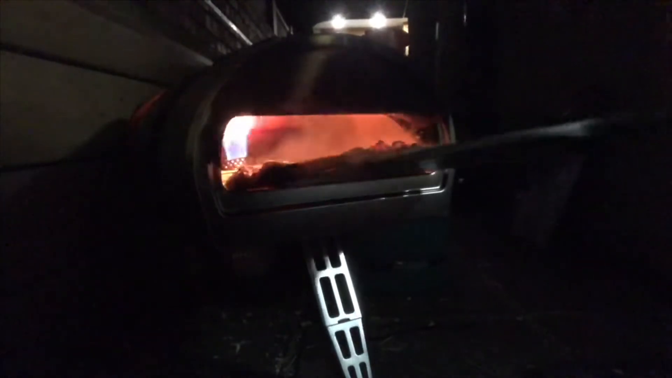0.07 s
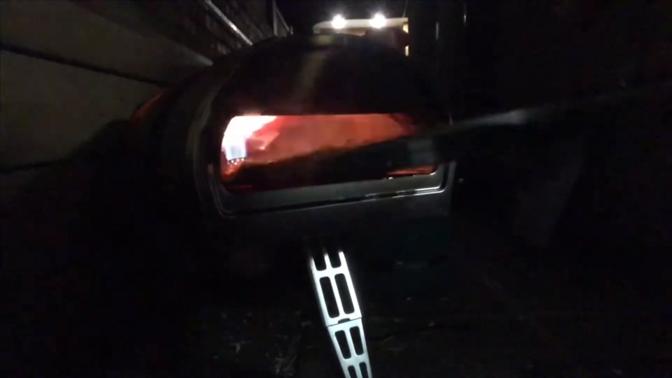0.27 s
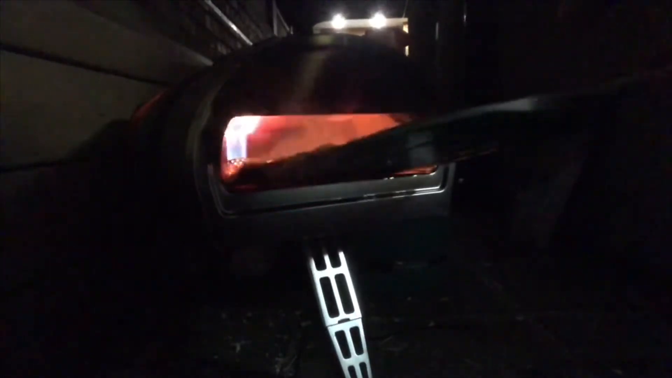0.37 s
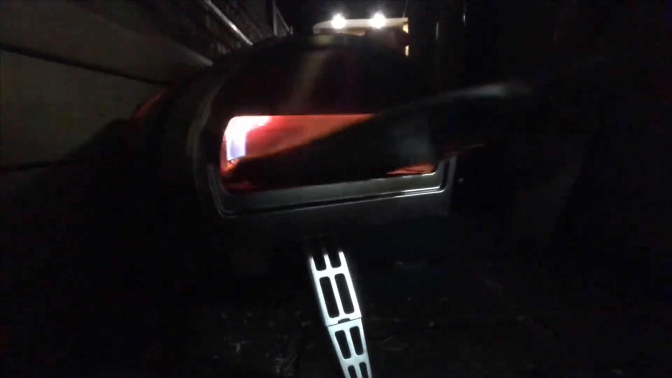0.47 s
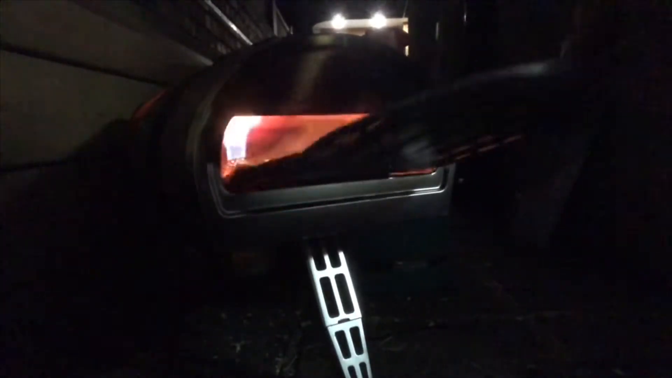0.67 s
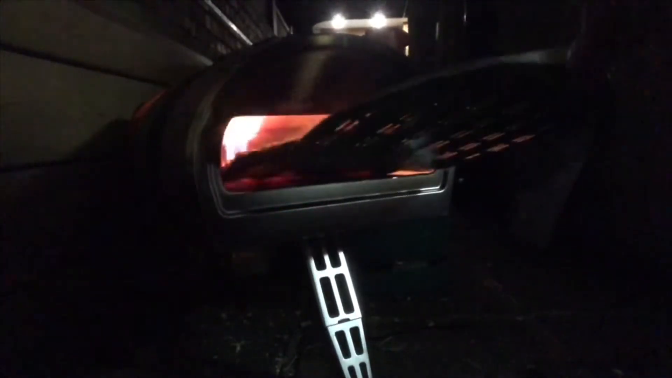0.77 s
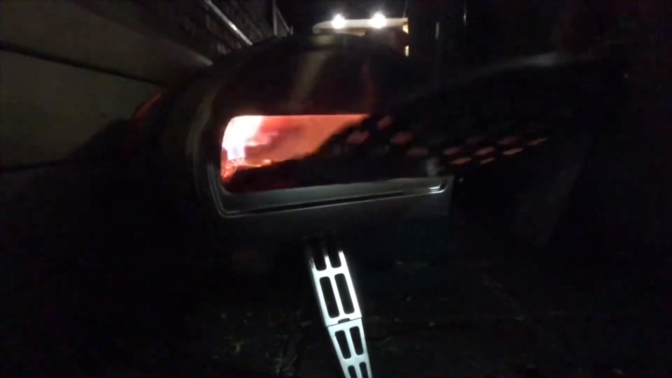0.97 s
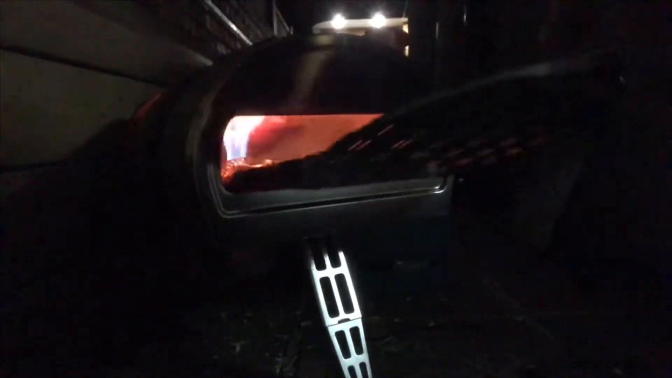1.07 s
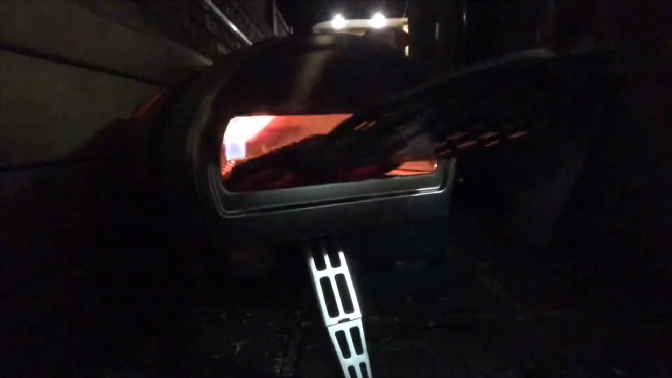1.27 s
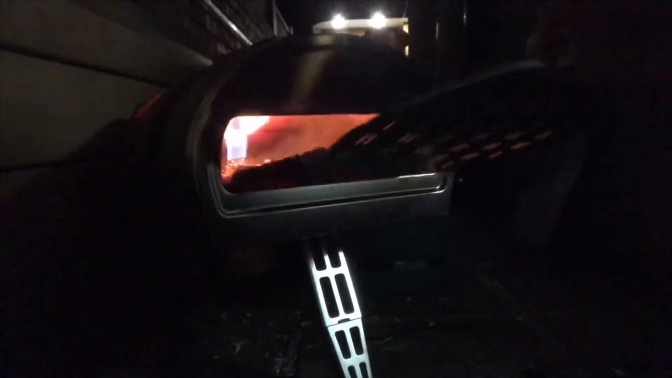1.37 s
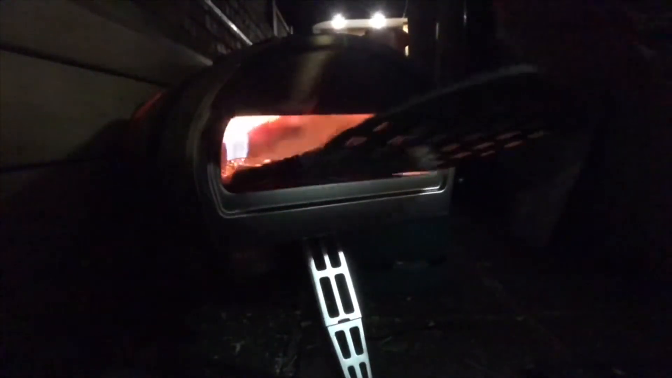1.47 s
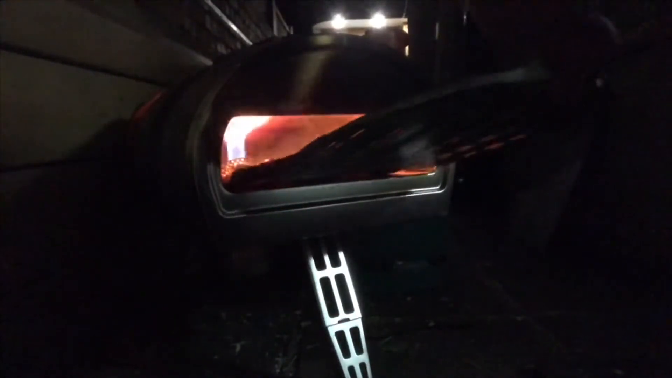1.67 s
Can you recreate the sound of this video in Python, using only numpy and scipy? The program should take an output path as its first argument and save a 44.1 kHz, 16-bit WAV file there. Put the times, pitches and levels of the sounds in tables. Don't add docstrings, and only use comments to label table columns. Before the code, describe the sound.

Metal blade rasping and clacking over gritty stone inside a boomy oven, gas burner hissing low

```python
import sys
import numpy as np
from scipy import signal
from scipy.io import wavfile

SR = 44100
rng = np.random.default_rng(int(sys.argv[2]) if len(sys.argv) > 2 else 0)


def undo_db(level):
    steps = np.asarray(level, float) / 20
    return 10 ** steps


def to_wav(sig):
    pcm = np.clip(np.atleast_2d(sig), -1, 1) * 32767
    pcm = np.round(pcm).astype(np.int16)
    wavfile.write(sys.argv[1], SR, pcm.T)


N = 74970
BOOM_HZ = 236

# [f/Hz, level/dB per Hz]
GRIT_COLOUR = [(880, -20.5), (1500, -3), (2370, -5), (2560, 1), (2970, -5.5), (3380, -2.5), (8240, -7.5),
               (16000, -17)]


def rms(x):
    return np.sqrt(np.mean(x ** 2))


def rms_one(x):
    return x / np.sqrt(np.mean(x ** 2) + 1e-20)


def drift(rate):
    r = np.exp(-40 * np.pi * rate / SR)
    start_up = 3000
    noise = rng.standard_normal(N // 20 + start_up + 2)
    slow = signal.lfilter([1], [1, -2 * r, r * r], noise)[start_up:]
    return np.interp(np.arange(N) / 20, np.arange(len(slow)), rms_one(slow))


def bandpass(x, low_hz, high_hz):
    return signal.sosfilt(signal.butter(2, [low_hz, high_hz], "band", fs=SR, output="sos"), x)


def resonate(x, hz, width):
    r = np.exp(-np.pi * width / SR)
    top = np.array([1, 0, -1]) * (1 - r * r) / 2
    return signal.lfilter(top, [1, -2 * r * np.cos(2 * np.pi * hz / SR), r * r], x + 1e-18)


def ring(x, hz, t60):
    r = undo_db(-60 / (t60 * SR))
    w = 2 * np.pi * hz / SR
    return signal.lfilter([0, np.sin(w)], [1, -2 * r * np.cos(w), r * r], x + 1e-18)


def banded(x, spectrum, patch_db, rate):
    hz, db = np.transpose(spectrum)
    edges = hz[0] * 2 ** np.arange(0, np.log2(hz[-1] / hz[0]) + .5, .5)
    out = 0
    for k, (low, high) in enumerate(zip(edges, np.minimum(edges[1:], .45 * SR))):
        colour = np.interp(np.log(low * high) / 2, np.log(hz), db)
        out = out + bandpass(x[k % 2], low, high) * undo_db(colour + patch_db * drift(rate))
    return rms_one(out)


def body(x, peaks, patch_db):
    out = 0
    for k, (hz, width, db) in enumerate(peaks):
        gain = (-1) ** k * undo_db(db + patch_db * drift(22))
        out = out + gain * resonate(x, hz, width) / np.sqrt(width)
    return rms_one(out)


def grains():
    grains_per_s, spread_db = 9000, 3
    sizes = undo_db(spread_db * np.minimum(rng.exponential(1, (2, N)), 5)) * rng.choice([-1, 1], (2, N))
    hit = sizes * (rng.random((2, N)) < grains_per_s / SR)
    return hit * undo_db(1.6 * drift(160))


def pressure(rows):
    rise_db, release_db_per_s = 16, 774
    t, power = np.arange(N) / SR, 0
    for start, rise, hold, db in rows:
        top = start + max(rise, .001)
        rising = rise_db * (t - top) / (top - start)
        releasing = np.minimum(0, release_db_per_s * (top + hold - t))
        shape = np.where(t < top, rising, releasing)
        power = power + undo_db(2 * np.maximum(shape + db, -150)) * (t >= start)
    return np.sqrt(power)


def strokes():
    # [start t/s, rise t/s, hold t/s]
    timing = [(.0, .002, .035), (.06, .003, .027), (.125, .058, .01), (.216, .002, .012),
              (.232, .004, .016), (.25, .012, .066), (.345, .03, .005), (.379, .004, .016),
              (.4, .004, .025), (.48, .016, .054), (.578, .024, .02), (.618, .008, .016), (.64, .004, .017),
              (.66, .002, .008), (.7045, .002, .007), (.716, .004, .02), (.74, .004, .025),
              (.898, .004, .018), (.925, .033, .013), (1.05, .03, .02), (1.124, .002, .003),
              (1.165, .022, .008), (1.26, .02, .025), (1.333, .004, .015), (1.353, .003, .015),
              (1.373, .003, .022), (1.403, .006, .03), (1.62, .01, .07), (1.626, .001, .001)]
    # [grit level/dB, tray level/dB relative to grit]
    force = [(-56.5, 2), (-46, -13.5), (-40, -11), (-39.5, -2.5), (-40.5, -2), (-39.5, -5.5), (-46.5, 6),
             (-34.5, -15), (-40.5, -29), (-34.5, -12), (-29.5, -15), (-27, -12), (-27.5, -8), (-25, -16.5),
             (-26.5, -5), (-48, 9), (-51.5, -17), (-51, 0.5), (-41.5, -17), (-54, -24), (-34.5, -22),
             (-36, -12), (-54, 2.5), (-56, 7.5), (-44.5, -3), (-42.5, -4), (-40.5, -5), (-52, -26),
             (-65, -18)]
    grit = pressure([(*when, db) for when, (db, _) in zip(timing, force)])
    tray = pressure([(*when, db + more) for when, (db, more) in zip(timing, force)])
    return grit, tray


def grit_hiss(sand, grit):
    return grit * banded(sand, GRIT_COLOUR, patch_db=1.3, rate=30)


def sheet_rasp(sand, grit):
    sheet = [1720, 1885, 2490, 2640, 2860, 3060, 3290, 3500, 3750, 3870, 4020, 4300, 4410, 4700, 4900, 5090,
             5360, 5680, 5810, 5995, 6270, 6450, 6650, 6780, 7060, 7340, 7580, 7710, 7990, 8170, 8490, 8720,
             9050, 9340, 9500, 9725, 10100, 10450, 10600, 11100, 11450, 11900, 12190, 12600]
    hz, db = np.transpose(GRIT_COLOUR)
    peaks = [(f, 11 + 0.0089 * f, np.interp(np.log(f), np.log(hz), db)) for f in sheet]
    return undo_db(-3.5) * rms(grit) * body(sand[0] * grit, peaks, patch_db=3.5)


def tray_scrape(sand, tray):
    # [f/Hz, width/Hz, level/dB]
    slab = [(960, 90, -14), (1100, 80, -12), (1250, 70, 0), (1540, 60, -15), (1720, 50, -15),
            (1880, 70, -13)]
    modes = rms(tray) * body(sand[1] * tray, slab, patch_db=-6.5)
    broad = tray * rms_one(bandpass(sand[0], 437, 2200))
    drone = undo_db(-13) * rms(tray) * rms_one(resonate(sand[1] * tray, BOOM_HZ, 12))
    return modes + undo_db(-1) * broad + drone


def burner():
    # [f/Hz, level/dB per Hz]
    flame = [(40, -9), (100, -3), (200, -5.5), (450, -18), (1500, -18.5), (4000, -19.5), (9000, -27.5),
             (16000, -37)]
    return undo_db(-50.5) * banded(rng.standard_normal((2, N)), flame, patch_db=1.4, rate=7.6)


def chamber(x):
    t = np.arange(SR // 2) / SR
    dull = signal.butter(1, 5700, fs=SR)
    tail = signal.lfilter(*dull, rng.standard_normal(len(t))) * undo_db(-60 * t / 0.22)
    return undo_db(-10) * signal.fftconvolve(x, tail / np.sqrt(np.sum(tail ** 2)))[:N]


def burst(white, start, length, hz, width, db):
    t = np.arange(N) / SR
    rub = np.sin(np.pi * np.clip((t - start) / length, 0, 1)) ** .5
    tone = resonate(white * rub, hz, width)
    return undo_db(db) * np.sqrt(length * SR / np.sum(tone ** 2)) * tone


def tray_slips(white):
    # [start t/s, length t/s, level/dB]
    slips = [(0.061, 0.021, -50.5), (0.256, 0.0099, -35), (0.299, 0.0063, -46), (0.495, 0.015, -33),
             (0.515, 0.0093, -35), (0.528, 0.0104, -43), (1.332, 0.0062, -55), (1.36, .01, -37.5),
             (1.37, 0.026, -39), (1.4, 0.0072, -35.5), (1.425, 0.0069, -36.5)]
    return sum(burst(white, start, length, 1250, 110, db) for start, length, db in slips)


def knocks():
    # [t/s, tap level/dB, blade ring level/dB, boom level/dB, contact cut-off f/Hz]
    hits = [(0.063, -48, -75, -74, 1960), (0.136, -61, -67, -41, 1520), (0.217, -32.5, -64, -44, 3940),
            (0.265, -24, -62, -43, 1350), (0.452, -24, -43.5, -37.5, 1940),
            (0.4953, -20.5, -59, -36.5, 1480), (0.61, -22, -56, -32.5, 2960), (.6615, -11, -61, -59, 6100),
            (.665, -9.5, -36, -72, 3500), (0.679, -45, -63, -24.5, 1990), (.722, -30, -37, -30, 1800),
            (0.8479, -26, -50, -41.5, 2800), (1.1255, -25, -52, -70, 15000), (1.127, -19, -60, -50, 1400),
            (1.131, -34, -70, -31.5, 1200), (1.168, -55, -70, -40, 1500), (1.1875, -36, -32, -50, 9000),
            (1.292, -24, -62, -43.5, 3180), (1.4384, -22.5, -68, -35.5, 2000)]
    # [f/Hz, level/dB, 60 dB fall t/s]
    blade_modes = [(1545, 3, .16), (1770, -18, .1), (2024, -11, .3), (2972, -14, .25), (3060, -15, .25),
                   (3494, -11, .1), (3881, -15, .15), (4511, -6, .11), (4877, -12, .12), (5356, -12, .12),
                   (6121, -8, .17), (6433, -5, .13), (7494, -15, .1), (8382, -3, .09)]
    # [f/Hz, level/dB], only the pitch is used
    rack = [(656.8, -63)]
    tap_s, bounce_s, bounce_db = 0.0022, .018, -16.5
    thud_db, thud_hz, thud_s = -21.5, 1060, 0.0047
    boom_t60_s, swell_s = 0.075, 0.055
    taps, booms, rings = np.zeros(N), np.zeros(N), np.zeros((len(blade_modes), N))
    blade_hz = np.transpose(blade_modes)[0]
    t = np.arange(2000) / SR
    bounce = undo_db(bounce_db) * np.exp(-(t - bounce_s) / tap_s) * (t > bounce_s)
    fall = np.exp(-t / tap_s) + bounce
    for s, tap_db, ring_db, boom_db, cut_hz in hits:
        i = int(s * SR)
        noise = rng.standard_normal(len(t))
        noise[0] = undo_db(14)
        tap = bandpass(noise * fall, 600, cut_hz)
        thud = bandpass(noise * t * np.exp(-t / thud_s), 450, thud_hz)
        taps[i:i + len(t)] += undo_db(tap_db) * tap / np.abs(tap).max()
        taps[i:i + len(t)] += undo_db(tap_db + thud_db) * thud / np.abs(thud).max()
        booms[i] += undo_db(boom_db)
        dull_db = 6 * np.log2(np.maximum(blade_hz / cut_hz, 1))
        rings[:, i] += undo_db(ring_db + rng.normal(0, 1, len(blade_modes)) - dull_db)
    blade = sum(undo_db(db) * ring(r, hz, t60) for r, (hz, db, t60) in zip(rings, blade_modes))
    boom = ring(ring(booms, BOOM_HZ, boom_t60_s), BOOM_HZ, swell_s)
    boom = boom * 4 * np.log(1000) / (swell_s * SR)
    strongest = booms * (booms == booms.max())
    return taps + blade + boom + undo_db(-28) * ring(strongest, rack[0][0], 3.5)


def narrow_sings(white):
    # [start t/s, length t/s, f/Hz, level/dB]
    songs = [(.215, .03, 2490, -46), (.245, .03, 7900, -48), (.29, .04, 4960, -45), (.25, .03, 4750, -44),
             (.255, .03, 3760, -45), (.26, .06, 1230, -41), (.32, .03, 207, -42), (.515, .055, 312, -39),
             (.585, .06, 4300, -39), (.6, .06, 2500, -38), (.61, .04, 1720, -41), (.62, .025, 8000, -37),
             (.62, .03, 9330, -38), (.585, .03, 7340, -43), (.51, .03, 3850, -43), (.6, .05, 6000, -39),
             (.66, .012, 2660, -31), (.66, .012, 3875, -30), (.66, .012, 1692, -33), (.66, .012, 1885, -32),
             (.704, .01, 5090, -37), (.35, .08, 4930, -49), (.752, .022, 1545, -42),
             (1.124, .006, 5400, -37), (1.125, .008, 6400, -38), (1.125, .008, 9400, -40),
             (.945, .05, 3060, -55), (.95, .03, 5680, -53), (.94, .04, 9400, -55), (1.335, .05, 9320, -52),
             (1.412, .025, 9320, -48), (1.372, .03, 6200, -48), (1.405, .035, 7000, -49),
             (1.375, .02, 1890, -44), (1.4, .04, 3460, -51), (1.43, .06, 2640, -53), (1.48, .06, 377, -53),
             (.6, .05, 12200, -48)]
    return sum(burst(white, start, length, hz, 15 + 0.006 * hz, db - 0.5)
               for start, length, hz, db in songs)


def stone_drags(sand):
    # [start t/s, rise t/s, hold t/s, level/dB]
    drags = [
        (0.245, 0.012, 0.076, -40),
        (0.362, 0.0052, 0.034, -46.5),
        (0.501, 0.0015, 0.022, -34.5),
        (0.641, 0.015, 0.01, -35),
        (0.725, 0.004, 0.013, -50),
        (0.836, 0.0078, 0.029, -52),
        (1.433, 0.0022, 0.0079, -36),
    ]
    # [f/Hz, width/Hz, level/dB]
    stone = [(180, 12, -6.5), (342, 32, 4.5), (397.6, 27, 0.5), (445, 114, 0.5), (565, 46, -2),
             (650, 147, 5), (720, 176, 3.5), (820, 130, -7), (964, 28, -7)]
    drag = pressure(drags)
    return rms(drag) * body(sand[0] * drag, stone, patch_db=2.5)


def scene():
    sand, white = grains(), rng.standard_normal(N)
    grit, tray = strokes()
    scrape = grit_hiss(sand, grit) + sheet_rasp(sand, grit) + tray_scrape(sand, tray) + stone_drags(sand)
    peel = scrape + tray_slips(white) + knocks() + narrow_sings(white)
    return np.tile(peel + chamber(peel) + burner(), (2, 1))


def roll_off(x):
    return signal.sosfilt(signal.butter(12, 16390, fs=SR, output="sos"), x)


def record(dry):
    ceiling = .9
    x = ceiling * np.tanh(dry / ceiling)
    x = signal.sosfilt(signal.butter(4, 41.4, "high", fs=SR, output="sos"), x)
    x = signal.sosfilt(signal.cheby2(14, 70, 16250, fs=SR, output="sos"), x)
    return roll_off(x)


dry = scene()
out = record(dry)
to_wav(out)
```